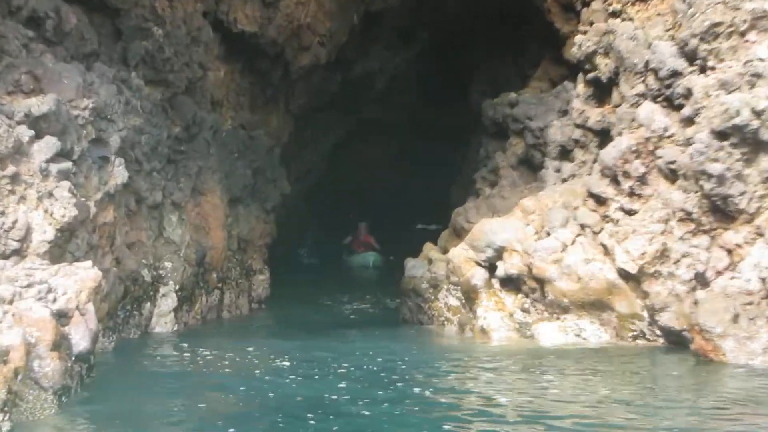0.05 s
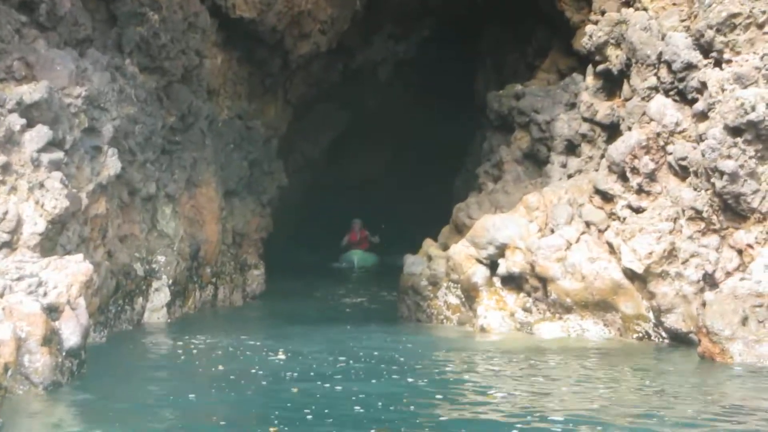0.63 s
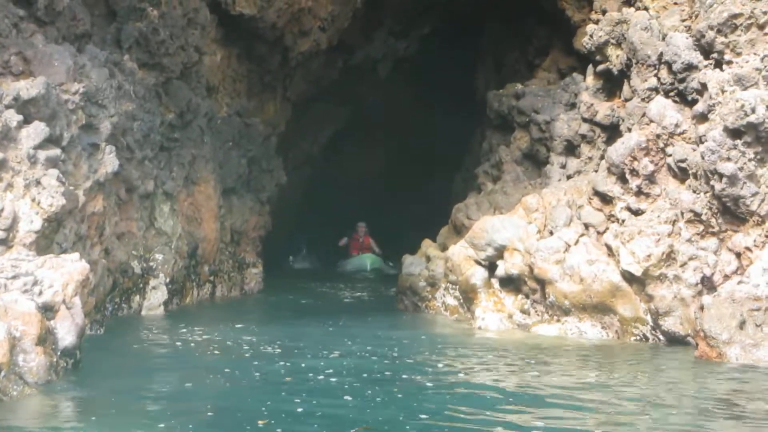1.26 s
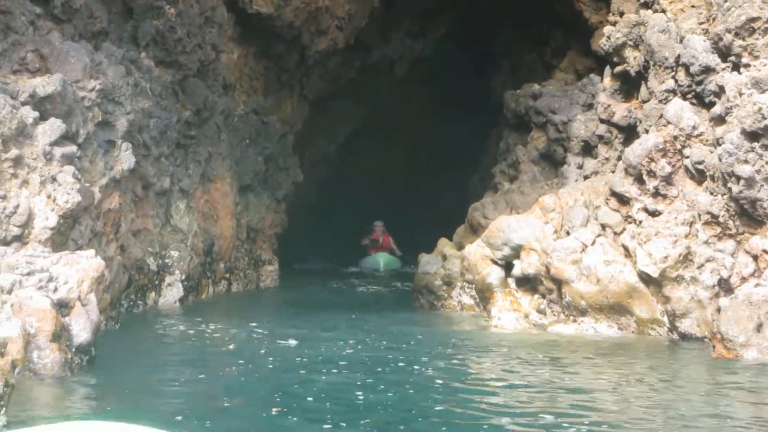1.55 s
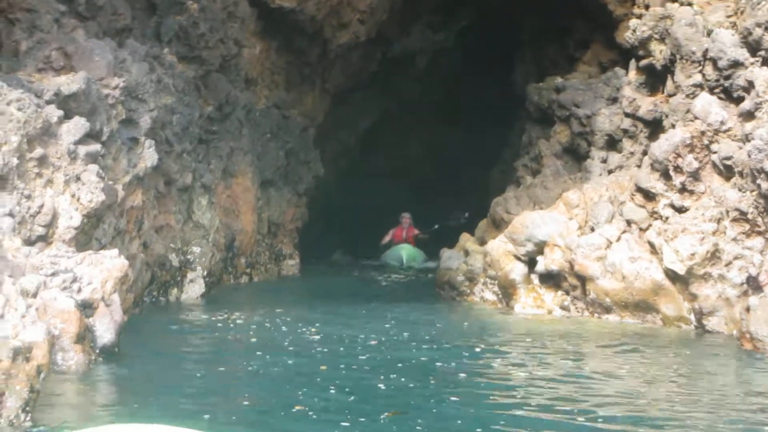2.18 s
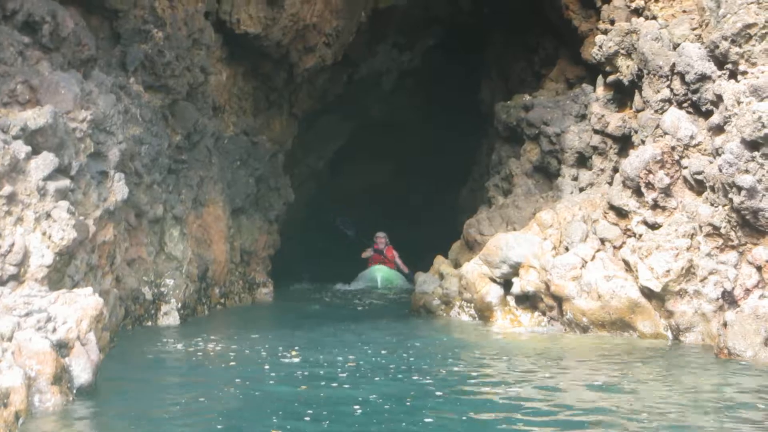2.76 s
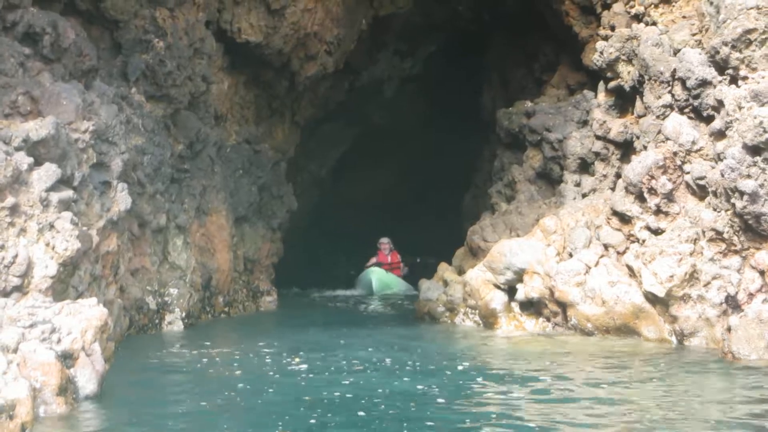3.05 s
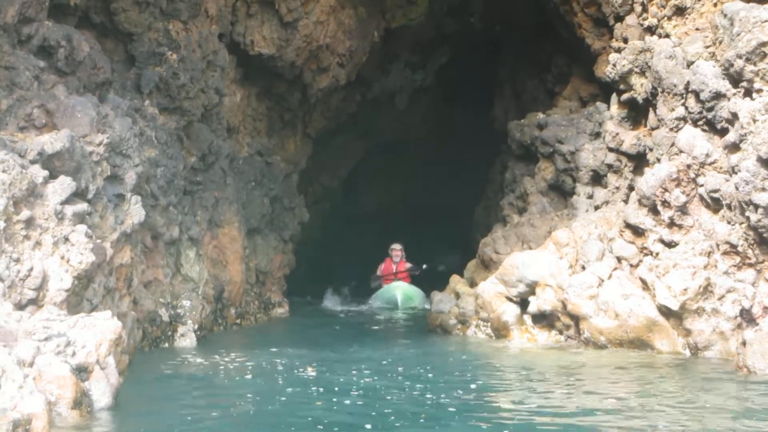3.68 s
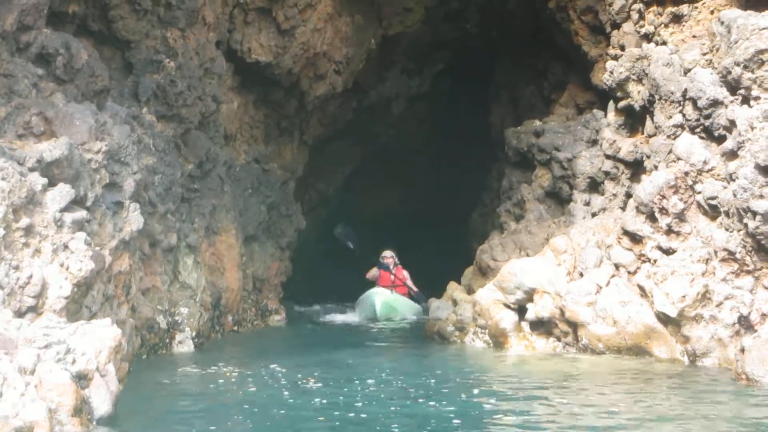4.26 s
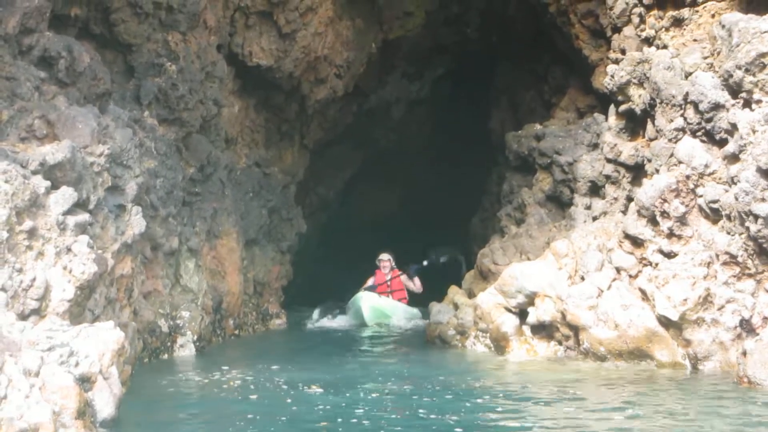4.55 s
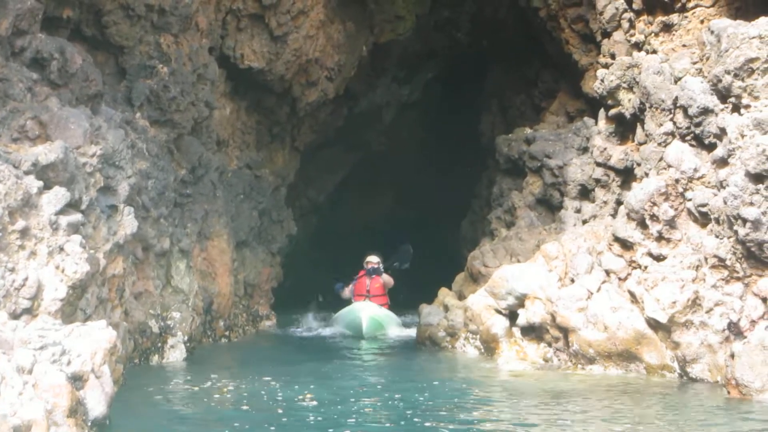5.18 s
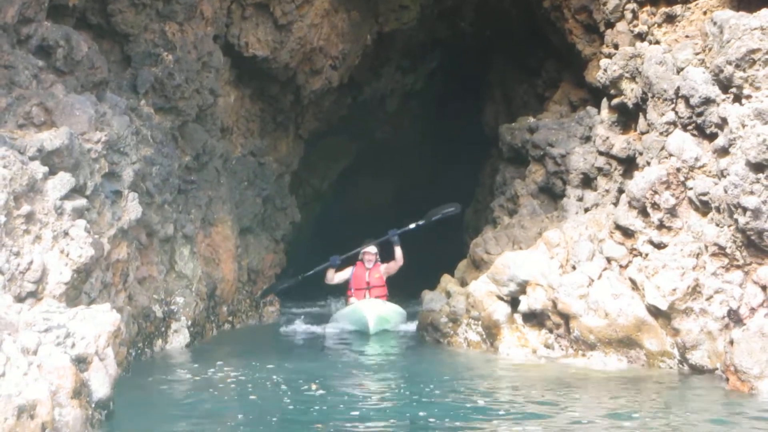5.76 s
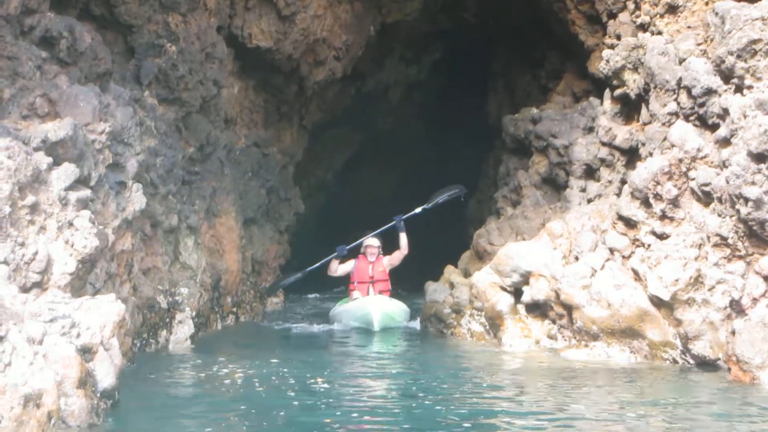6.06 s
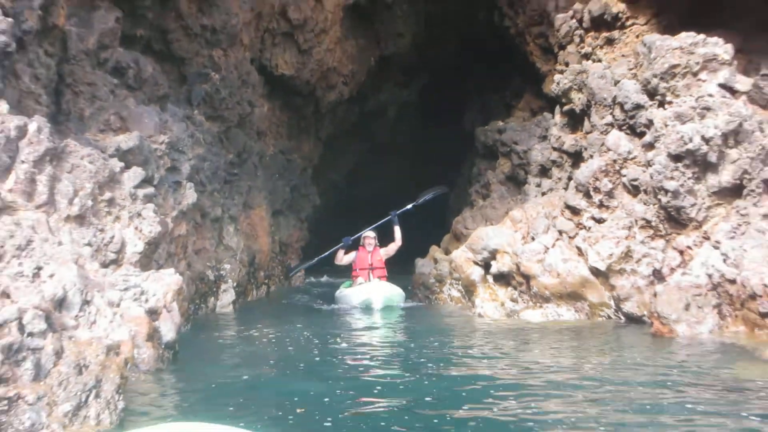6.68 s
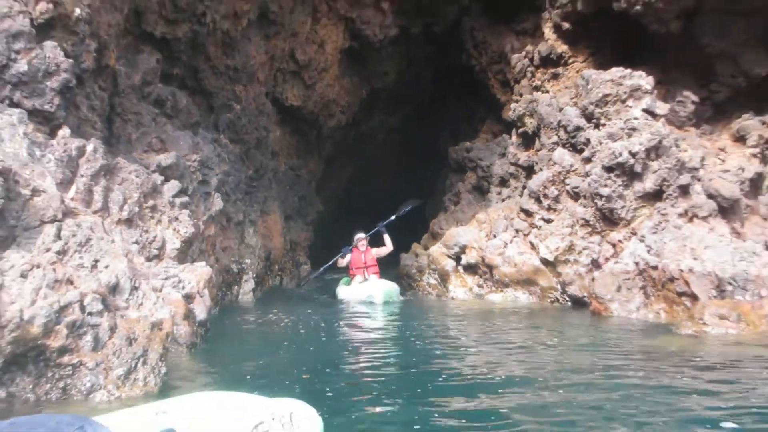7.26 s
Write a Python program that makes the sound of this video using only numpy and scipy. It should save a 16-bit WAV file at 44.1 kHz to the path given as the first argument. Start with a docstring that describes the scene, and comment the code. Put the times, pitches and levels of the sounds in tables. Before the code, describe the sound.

Gentle water washes steadily in a sea cave with small plops, while fingers click and rub on the camera close by.

```python
"""The mouth of a rock cave by the sea, in mono on a small hand-held camera's own microphone.
Countless bubbles merge into a gentle wash with one slow swell; small ones plop along the rocks, and far
paddle strokes throw droplets. Right at the microphone, fingers click, bump and rub the camera's shell
and snap a button. A mechanism inside hisses with a thin whine until it stops near the end, and the
lens then ticks as it zooms out."""
import sys
import numpy as np
from scipy import signal
from scipy.fft import rfft, irfft, next_fast_len
from scipy.io import wavfile
from scipy.ndimage import uniform_filter1d

SR = 44100
rng = np.random.default_rng(int(sys.argv[2]) if len(sys.argv) > 2 else 0)


def master_out(mix):
    """Clip the mix to full scale and print it as 16-bit PCM to the path in sys.argv[1]."""
    frames = np.transpose(np.atleast_2d(mix))
    ceiling = np.clip(frames, -1, 1)
    pcm = np.round(ceiling * 32767).astype(np.int16)
    wavfile.write(sys.argv[1], SR, pcm)


N = 323253
TIME = np.arange(N) / SR
RING = TIME[:4096]  # time axis of one short sound

# noise spectra of the microphone, the mechanism and the wash: f/Hz, relative level/dB
MIC_SPECTRUM = [(2000, -17), (5800, -9.5), (6800, -12.5), (7400, -5), (7800, 0.0), (8350, 0.0), (8750, -12),
                (9400, -10), (9800, -5), (10200, -13), (12000, -12), (15500, -16.5)]
MOTOR_SPECTRUM = [(2000, -8.5), (3200, -6), (3700, 1), (4200, -7), (5000, -3), (5800, -4), (6600, -9),
                  (7300, -1), (8250, 1.1), (8750, -14), (9800, -11.5), (10500, -15.5), (14000, -26),
                  (16000, -29)]
SEA_SPECTRUM = [(20, -13.5), (60, -4.5), (180, -2), (500, 0.5), (780, -1.5), (1100, -0.2), (1400, -3),
                (2000, -2.5), (2750, -0.8), (3150, -7.5), (3750, -13), (4600, -16.5), (5600, -31.5),
                (8000, -36)]
# tones of the mechanism's whine: f/Hz, relative level/dB
WHINE_TONES = [(7246, -14), (7718, -6), (8484, -13)]
# modes of the lens drive and of the camera body: f/Hz, width/Hz, relative level/dB
LENS_MODES = [(550, 400, -2), (1140, 410, 1), (7530, 600, -6), (8270, 480, 0.5), (9800, 500, -17.5)]
BODY_MODES = [(181, 170, 1), (400, 320, 6.5), (1030, 200, 11)]
# shell modes in four families, from the whole case down to small parts: f/Hz, width/Hz, relative level/dB
SHELL_FAMILIES = [
    [(1897, 360, -5.5), (2550, 420, -2.5), (2835, 325, 3), (2990, 61, -11)],
    [(3610, 400, 8), (4190, 480, 8)],
    [(5540, 900, -0.5), (6630, 570, 3.5)],
    [(7600, 660, -6.5), (8740, 690, 6), (9620, 420, -5), (10400, 700, -8.5), (13600, 1500, -26)],
]
# middle of each family: f/Hz
FAMILY_HZ = [2670, 3920, 6040, 9000]
# how strongly a click, a rub and the button excite each family: relative level/dB
CLICK_MIX_DB = [0, -7.5, -3, 0]
RUB_MIX_DB = [-.5, -0.5, 0, -8.5]
BUTTON_MIX_DB = [-17.5, -15.5, 0.5, -11.5]
# single ticks of the lens drive: t/s, relative peak/dB
LENS_TICKS = [(0.0642, -38), (0.1444, -40), (6.9647, -48)]
# finger strokes over the shell: start/s, end/s, relative level/dB, brightest f/Hz at mid-stroke
FINGER_RUBS = [(0.46, 0.563, -57.5, 6200), (0.572, 0.69, -50, 5400), (0.712, 0.749, -46.5, 4570),
               (0.763, 0.866, -49, 5400), (0.953, 0.984, -48, 3800), (1.003, 1.031, -49, 4000),
               (1.144, 1.195, -50, 4400), (1.305, 1.51, -57.5, 4600), (1.618, 1.668, -51, 5800)]
# finger clicks on the shell: t/s, relative level/dB, case note f/Hz, contact/s
FINGER_CLICKS = [(.0976, -41, 2554, 0.00034), (.1632, -47, 2573, .00028), (.1765, -41, 2613, .00019),
                 (0.227, -26.5, 2410, .00021), (0.2374, -27, 2510, 0.00019), (0.3327, -24, 2670, .00003),
                 (0.3437, -35.5, 2900, .00003), (0.4561, -39, 2660, .00006), (1.1499, -40.5, 2260, .0002),
                 (1.232, -45, 2640, .00014), (1.8441, -43.5, 2730, 0.00013), (2.3284, -46, 2550, .00026),
                 (6.052, -44, 2640, 0.00012), (6.1274, -42, 2820, 0.00027), (6.13, -39, 2760, .00033)]
# the button going down and coming back: t/s, relative level/dB
BUTTON_SNAPS = [(1.2152, -32.5), (1.2395, -27.5)]
# soft low thuds of the camera body, from the hand or under a lens tick: t/s, peak/dB, contact/s
BODY_THUDS = [(0.065, -38, .0003), (0.1379, -14, 0.00094), (0.4558, -31.5, 0.00036), (6.0489, -26, 0.0032),
              (6.984, -37.5, 0.00048), (7.185, -39, 0.00068)]
# far paddle strokes at the cave mouth: t/s, level/dB, rise time/s
PADDLE_STROKES = [(2.183, -55, 0.042), (2.72, -60, .04), (3.92, -53, .06), (4.656, -54, 0.041),
                  (5.32, -58, 0.068)]
# bubbles near the microphone: t/s, level/dB, starting f/Hz, ring/cycles, pitch rise/fraction
NEAR_PLOPS = [(.3115, -36.5, 1100, 27, .1), (2.1455, -31, 466, 13.5, 0.085), (3.918, -37.5, 1000, 33, .1),
              (4.481, -39.5, 1845, 90, 1.5), (6.435, -41.5, 660, 26.4, .1)]

CASE_HZ = 2640  # note of the case when held loosely


def amp(db):
    """Decibels to gain."""
    return 10 ** (np.asarray(db) / 20)


def unit(x):
    """Scale to rms 1."""
    return x / np.sqrt(np.mean(x ** 2))


def add(out, s, x):
    """Mix x into out from time s."""
    i = max(int(s * SR), 0)
    out[i:i + len(x)] += x[:max(N - i, 0)]


def colour(x, points):
    """Filter by a spectrum of points: f/Hz, level/dB."""
    hz, db = np.transpose(points)
    size = next_fast_len(N)
    f = np.maximum(np.fft.rfftfreq(size, 1 / SR), 1)
    gain = amp(np.interp(np.log(f), np.log(hz), db))
    return irfft(rfft(x, size) * gain, size)[:N]


def band(x, lo_hz, hi_hz):
    """Band-pass."""
    return signal.sosfilt(signal.butter(3, [lo_hz, hi_hz], "band", fs=SR, output="sos"), x)


def walk(rate_hz):
    """Smooth random wander with a spread near 1."""
    hold = int(SR / rate_hz)
    steps = np.repeat(rng.standard_normal(N // hold + 1), hold)
    return 1.31 * uniform_filter1d(steps, hold)[:N]


def grains(per_s, spread_db):
    """Tiny impulses at random moments, a few much stronger than the rest."""
    size = amp(spread_db * np.minimum(rng.exponential(size=N), 4))
    return unit((rng.random(N) < per_s / SR) * size * rng.choice([-1, 1], N))


def ring(modes, scatter, stretch=1):
    """Struck modes swell for a few cycles and die; each blow detunes them a little."""
    out = 0
    for k, (hz, width, db) in enumerate(modes):
        age = np.pi * width * RING
        turns = hz * stretch * (1 + scatter * rng.standard_normal()) * RING
        out += (-1) ** k * amp(db) * width * age * np.exp(-age) * np.sin(2 * np.pi * turns)
    return out


def cave(x, t60_s, wet_db):
    """The rock walls around the microphone return a diffuse tail."""
    tail = rng.standard_normal(SR) * amp(-60 * TIME[:SR] / t60_s)
    return x + amp(wet_db) * signal.fftconvolve(x, tail / np.linalg.norm(tail))[:N]


def mic_hiss(level_db):
    """The microphone's own faint, steady hiss."""
    return amp(level_db) * unit(colour(rng.standard_normal(N), MIC_SPECTRUM))


def mechanism(on_s, off_s, hiss_db, whine_db, waver, ramp_s=.008):
    """The drive inside the camera hisses with a thin, wavering whine, a little louder before it stops."""
    running = np.clip(np.minimum(TIME - on_s, off_s - TIME) / ramp_s + .5, 0, 1)
    rise_db = np.interp(TIME, [off_s - 1.2, off_s], [0, 1.4])
    turns = np.cumsum(1 + waver * walk(40)) / SR
    whine = unit(sum(amp(db) * np.sin(2 * np.pi * hz * turns) for hz, db in WHINE_TONES))
    hiss = unit(colour(rng.standard_normal(N), MOTOR_SPECTRUM))
    return running * amp(rise_db) * (amp(hiss_db) * hiss + amp(whine_db) * whine)


def lens(zoom_s, loudest_s, gain_db, turn_s=.2, fade_db_per_s=13):
    """The lens drive ticks singly, and three times a turn in a run that swells and fades as it zooms."""
    steps = [turn + step for turn in np.arange(zoom_s, N / SR, turn_s) for step in (0, .08, .1195)]
    zoom = [(s, -45.5 - fade_db_per_s * abs(s - loudest_s)) for s in steps]
    out = np.zeros(N)
    for s, db in LENS_TICKS + zoom:
        tick = ring(LENS_MODES, scatter=.006)
        add(out, s, amp(db + gain_db) * tick / np.abs(tick).max())
    return out


def paddle(lo_hz, hi_hz):
    """Far off, each stroke throws a short shower of droplets, dulled by distance."""
    shower = 0
    for s, db, rise_s in PADDLE_STROKES:
        age = np.maximum(TIME - s, 0) / rise_s
        shower += amp(db) * age * np.exp(1 - age)
    droplets = unit(band(grains(per_s=1500, spread_db=3), lo_hz, hi_hz))
    return cave(shower * droplets, t60_s=.8, wet_db=-15)


def rubs(gain_db, edge_s, uneven_db, skin_db, fall_db_per_oct=8, sink_oct_per_s=4):
    """Skin slides over the shell in tiny slips under uneven pressure; each stroke dulls as it slows."""
    out = np.zeros(N)
    for modes, family_hz, mix_db in zip(SHELL_FAMILIES, FAMILY_HZ, RUB_MIX_DB):
        slips = grains(per_s=5000, spread_db=3)
        (lo_hz, lo_width, _), (hi_hz, hi_width, _) = modes[:2]
        skin = unit(band(slips, lo_hz - lo_width, hi_hz + hi_width))
        for start, end, db, bright_hz in FINGER_RUBS:
            touching = (TIME > start - 3 * edge_s) & (TIME < end + 3 * edge_s)
            t = TIME[touching]
            force = (1 + np.tanh(np.minimum(t - start, end - t) / edge_s)) / 2
            octaves_off = np.log2(family_hz / bright_hz) + sink_oct_per_s * (t - (start + end) / 2)
            gain = amp(db + mix_db - fall_db_per_oct * np.abs(octaves_off))
            shell = signal.fftconvolve(slips[touching], ring(modes, scatter=.063))[:len(t)]
            out[touching] += gain * force * (unit(shell) + amp(skin_db) * skin[touching])
    return amp(gain_db + uneven_db * walk(70)) * out


def strike(family_db, note_hz, crack_db=-3, crack_s=.0007):
    """A blow cracks at the contact and rings the shell; the grip bends the note of the case."""
    crack = unit(band(rng.standard_normal(len(RING)), 2000, 15000)) * np.exp(-RING / crack_s)
    out = amp(family_db[-1] + crack_db) * crack
    for k, (modes, db) in enumerate(zip(SHELL_FAMILIES, family_db)):
        family = ring(modes, scatter=.022, stretch=note_hz / CASE_HZ if k == 0 else 1)
        out += amp(db) * family / np.linalg.norm(family) * np.sqrt(.005 * SR)  # energy of 5 ms at db
    return out


def button():
    """The button's spring snaps and rings mainly the small parts."""
    out = np.zeros(N)
    for s, db in BUTTON_SNAPS:
        add(out, s, amp(db) * strike(BUTTON_MIX_DB, CASE_HZ))
    return out


def clicks():
    """Fingers click right by the microphone: the longer the contact, the less the high modes speak."""
    out = np.zeros(N)
    for s, db, note_hz, contact_s in FINGER_CLICKS:
        loss_db = 20 * np.log10(np.e) * (np.array(FAMILY_HZ) * contact_s) ** 2
        add(out, s, amp(db) * strike(CLICK_MIX_DB - loss_db + loss_db[0], note_hz))
    return out


def thuds(snap):
    """The camera body thuds from the hand or under a lens tick: the softer the contact, the duller."""
    out = np.zeros(N)
    body = sum(amp(db) * width * np.exp(-np.pi * width * RING) * np.cos(2 * np.pi * hz * RING)
               for hz, width, db in BODY_MODES)
    for s, db, contact_s in BODY_THUDS:
        push = np.sin(np.pi * np.minimum(RING / contact_s, 1)) ** 2
        push[int(.7 * contact_s * SR)] += snap * push.sum()  # small snap late in the contact
        thud = band(signal.fftconvolve(push, body), 64, 1240)
        add(out, s, amp(db) * thud / np.abs(thud).max())
    return out


def bubble(hz, cycles, glide):
    """An air pocket rings and rises in pitch as it nears the surface."""
    age = hz * RING / cycles
    turns = np.cumsum(hz * (1 + glide * np.minimum(2 * age, 1))) / SR
    envelope = (1 - np.exp(-2 * hz * RING)) * amp(-60 * age)
    return envelope * np.sin(2 * np.pi * turns)


def plops(lap_db, count):
    """A few bubbles plop close by, and many small ones lap along the rocks."""
    out = np.zeros(N)
    for s, db, hz, cycles, glide in NEAR_PLOPS:
        add(out, s, amp(db) * bubble(hz, cycles, glide))
    for when, pitch, faintness in rng.random((count, 3)):
        plop = bubble(hz=350 * 8 ** pitch, cycles=26, glide=.15)
        add(out, when * N / SR, amp(lap_db - 13 * faintness) * plop)
    return cave(out, t60_s=.74, wet_db=-8)


def swell_db(t, crest_s=6, rise_s=2.9, ebb_s=.9):
    """One swell builds slowly, breaks and ebbs to below the steady wash."""
    return np.interp(t - crest_s, [-rise_s, 0, ebb_s], [0, 3, -2])


def sea(low_db, bright_db, fizz_db, drift_db, flicker_db):
    """Countless bubbles and droplets merge into a wash; each size of bubble comes and goes on its own."""
    low = low_db + .42 * swell_db(TIME - .3)  # the low wash follows the swell weakly and late
    bright = bright_db + swell_db(TIME)
    drift = drift_db * walk(2.98)
    edges_hz = np.geomspace(20, 10240, 13)
    wash = 0
    for lo_hz, hi_hz in zip(edges_hz, edges_hz[1:]):
        treble = np.clip(np.log2(hi_hz / 1000), 0, 1)
        water = rng.standard_normal(N) + treble * amp(fizz_db) * grains(per_s=500, spread_db=4.5)
        db = (1 - treble) * low + treble * bright + drift + flicker_db * walk(14)
        wash += band(water * amp(db), lo_hz, hi_hz)
    return cave(colour(wash, SEA_SPECTRUM), t60_s=.98, wet_db=-11)


def scene():
    """One microphone on both channels: water with the cave's echo, hands and camera close and dry."""
    water = sea(low_db=-41, bright_db=-41.5, fizz_db=-7, drift_db=.5, flicker_db=.66)
    water += plops(lap_db=-48.5, count=90) + paddle(lo_hz=910, hi_hz=2900)
    casing = clicks() + button() + thuds(snap=.16)
    casing += rubs(gain_db=-.3, edge_s=.0069, uneven_db=2.5, skin_db=-1)
    drives = mechanism(on_s=.187, off_s=6.1, hiss_db=-57, whine_db=-69, waver=.000417)
    drives += lens(zoom_s=6.5845, loudest_s=7.1, gain_db=5)
    return np.tile(water + casing + drives + mic_hiss(level_db=-63.5), (2, 1))


def record(dry):
    """The camera has a narrow notch at 12.4 kHz and cuts the top above 15.8 kHz."""
    notched = signal.lfilter(*signal.iirnotch(12400, Q=35, fs=SR), dry)
    return signal.sosfilt(signal.ellip(8, .2, 70, 15800, fs=SR, output="sos"), notched)


dry = scene()
out = record(dry)
master_out(out)
```